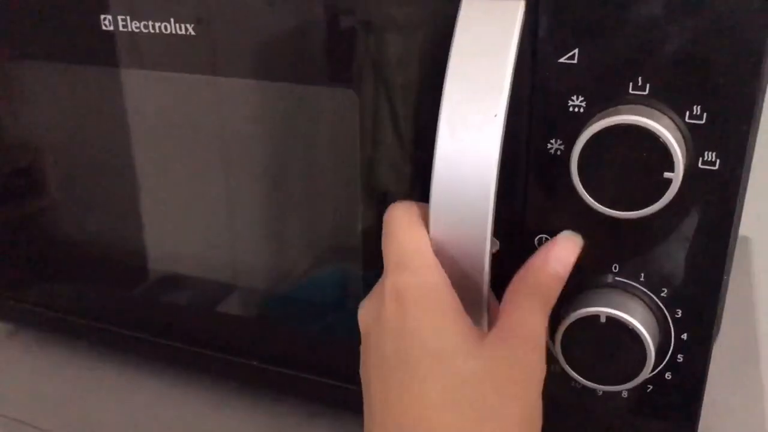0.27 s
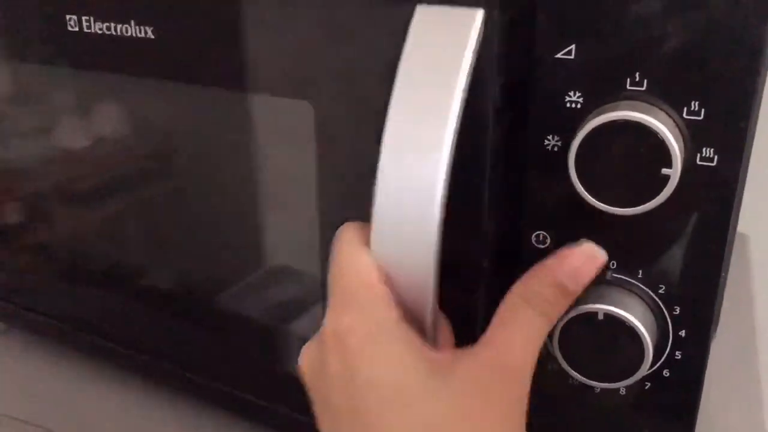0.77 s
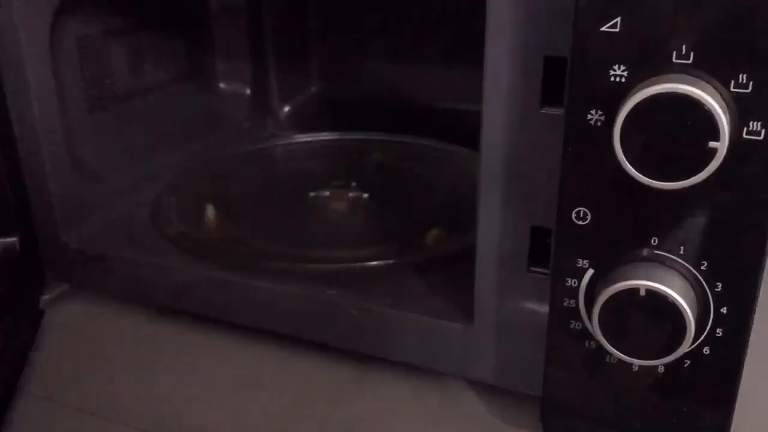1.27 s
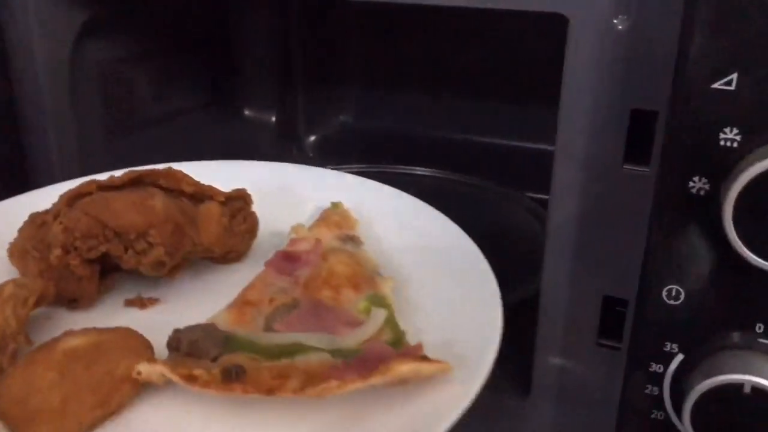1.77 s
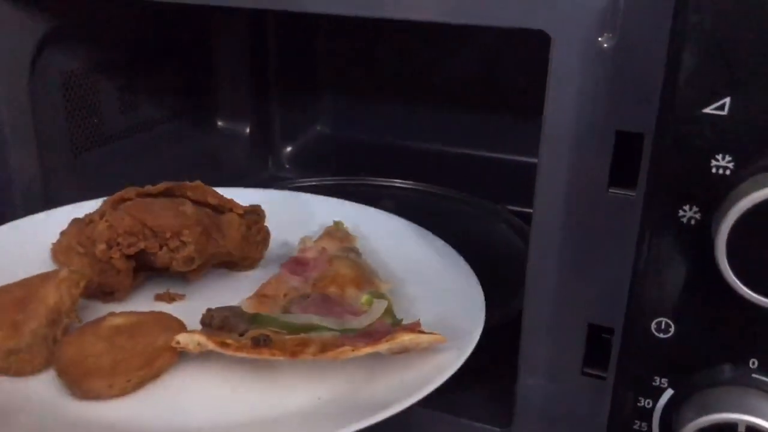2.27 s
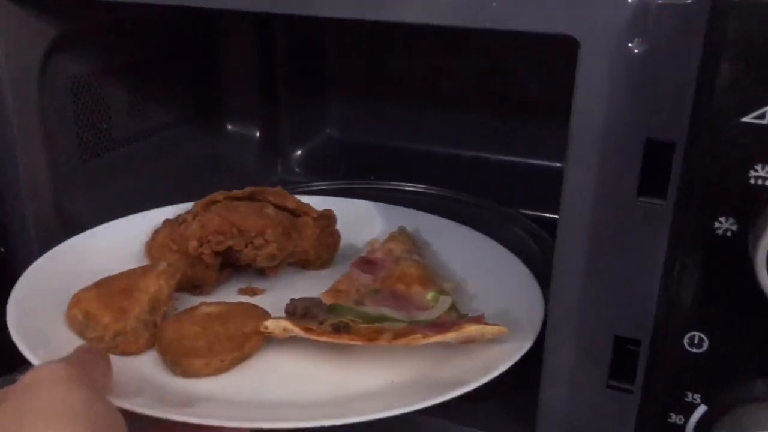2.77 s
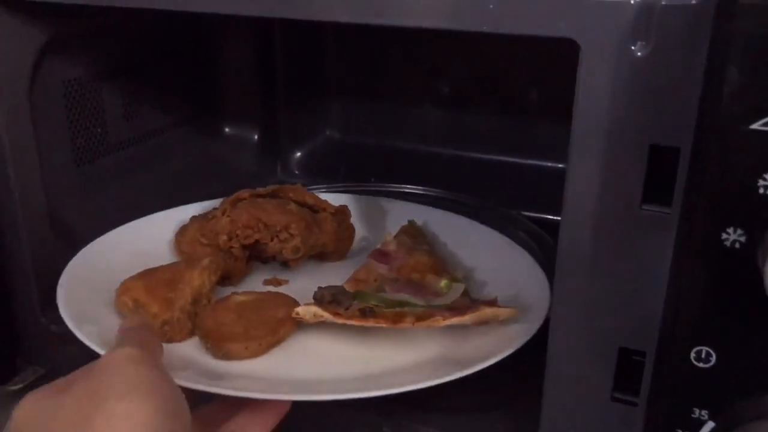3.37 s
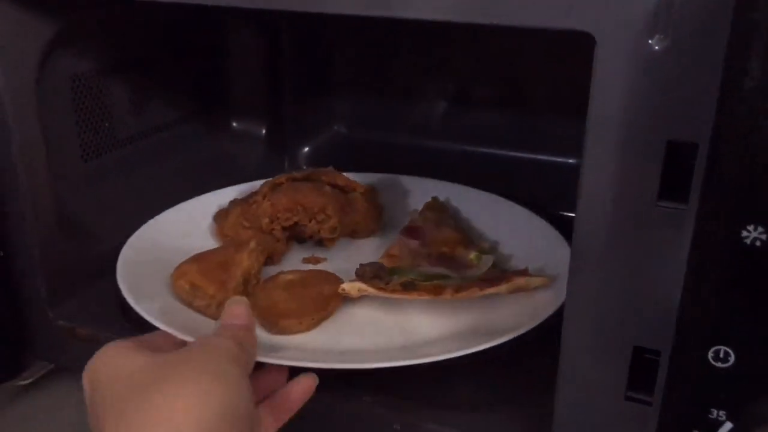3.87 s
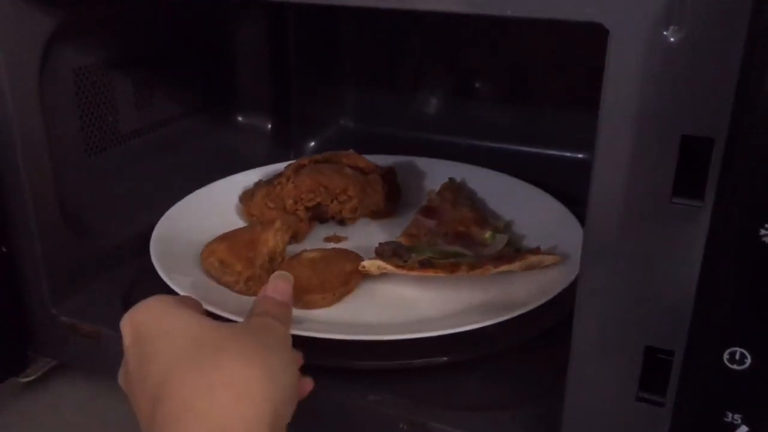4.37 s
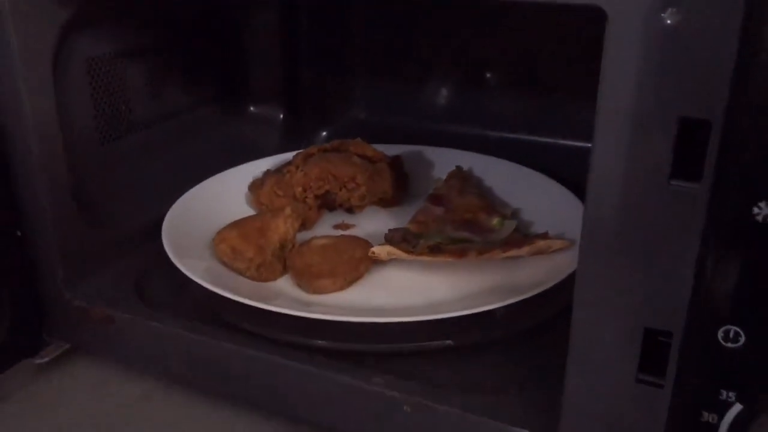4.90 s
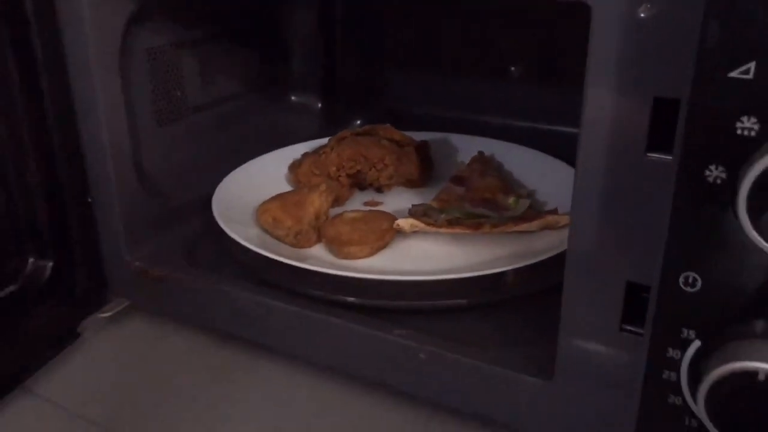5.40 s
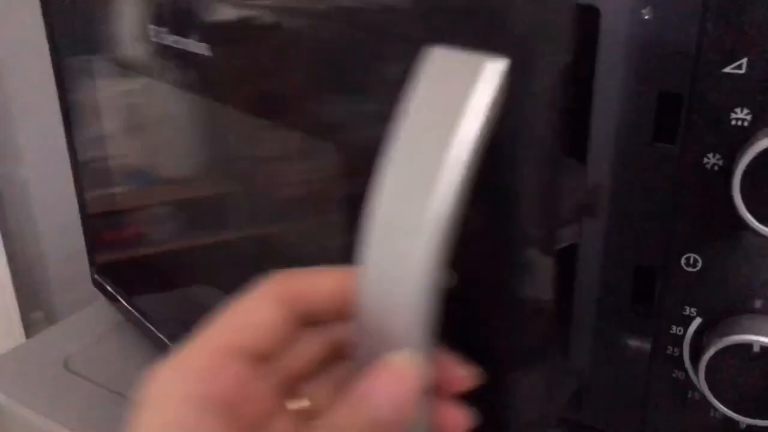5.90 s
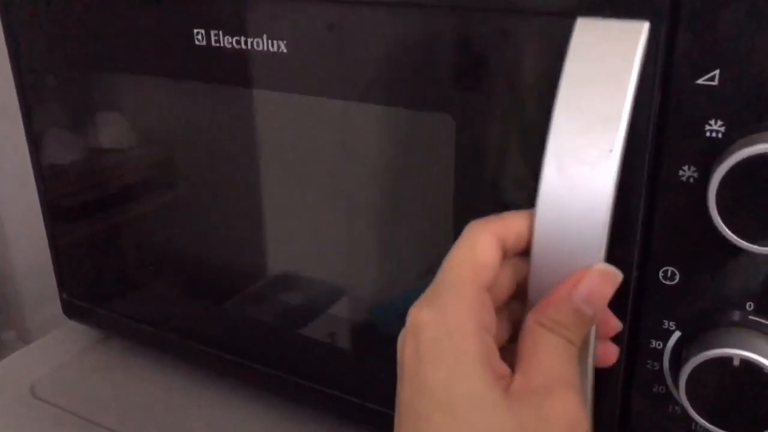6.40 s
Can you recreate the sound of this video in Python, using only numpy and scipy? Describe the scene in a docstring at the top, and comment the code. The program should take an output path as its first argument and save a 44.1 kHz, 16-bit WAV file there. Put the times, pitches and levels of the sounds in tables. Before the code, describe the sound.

A microwave oven door knocks and unlatches, a faint low hum begins, a china plate clinks and clatters onto the glass turntable, and the door snaps shut.

```python
"""Over soft room noise a microwave door knocks and is unlatched; a low electric hum then starts.
A china plate clinks against the glass turntable, clatters down on it and is slid to the middle.
The door swings back, knocking lightly, and snaps shut.
Blows are short forces driving decaying modes and noise bursts; rubs are gritty noise through like bodies.
Hum is a few wavering sines; room noise is coloured noise."""
import sys
import numpy as np
from scipy import signal
from scipy.io import wavfile

SR = 44100
rng = np.random.default_rng(int(sys.argv[2]) if len(sys.argv) > 2 else 0)


def put_to_file(sound):
    """Save the sound as 16-bit audio at rate SR, in the file named by the first command-line argument."""
    columns = np.atleast_2d(sound).T  # one column per channel
    safe = np.clip(columns, -1, 1)
    whole_steps = np.round(safe * 32767)
    wavfile.write(sys.argv[1], SR, whole_steps.astype(np.int16))


N = 293265
TIME = np.arange(N) / SR
RING_TIME = TIME[:SR]
CUTOFF_HZ = 15900

# sprung latch snapping open, then shut: (time [s], level [dB])
LATCH_SNAP_EVENTS = [(0.639, -17.5), (6.5486, -10)]
# ringing modes of the china plate: (frequency [Hz], relative level [dB], t60 [s])
CHINA_MODES = [(872, -11.5, 0.48), (847, -17, 0.2), (868, -20, 0.56), (950, -23, 0.36), (1111, -10, 0.4),
               (1120, -17, 0.19), (1698, 3, 0.17), (1738, -4.5, 0.25), (1704, -7.5, 0.47),
               (2160, -20, 0.28), (2330, -16, 0.2), (3146, -11, 0.41), (3240, -1, 0.19), (3220, -14.5, .2),
               (3800, -35.5, .24), (4380, -25.5, .28), (5130, -20.5, 0.34), (5030, -22.5, .2),
               (5520, -12.5, 0.2), (6360, -30, .15), (6960, -13, .19), (7500, -18.5, 0.17),
               (7500, -26, .24), (9400, -27, 0.26), (9590, -5.5, 0.14), (12700, -16.5, .14),
               (14060, -23, 0.12)]


def from_db(db):
    """Decibels to gain."""
    return 10 ** (np.asarray(db) / 20)


def rms_one(x):
    """Scale to rms 1."""
    return x / np.sqrt(np.mean(x ** 2) + 1e-20)


def unit_energy(x):
    """Scale a response so that it passes white noise at an unchanged level."""
    return x / np.linalg.norm(x)


def at_hz(points, hz):
    """Read a table on a log-frequency axis."""
    f, value = np.transpose(points)
    return np.interp(np.log(hz), np.log(f), value)


def fade(t60_s):
    """Exponential decay, 60 dB down after t60."""
    return np.exp(-np.log(1000) * RING_TIME / t60_s)


def drift(knots_per_s, size=N):
    """Random wander: straight lines between normal knots of spread 1."""
    knots = rng.standard_normal(4096)
    return np.interp(TIME[:size] * knots_per_s, np.arange(len(knots)), knots)


def through(x, response):
    """Drive a body with a force."""
    return signal.fftconvolve(x, response)[:N]


def add(track, s, sound):
    """Mix a sound into a track at time s."""
    start = int(s * SR)
    track[start:start + len(sound)] += sound[:N - start]


def coloured(colour, envelope):
    """Noise in bands, each under envelope(hz) with the energy its colour gives; overall rms 1."""
    edges_hz = np.geomspace(22, 17000, 23)
    out = 0
    for low, high in zip(edges_hz, edges_hz[1:]):
        hz = np.sqrt(low * high)
        shape = envelope(hz)
        band_filter = signal.butter(2, [low, high], "band", fs=SR, output="sos")
        band = signal.sosfilt(band_filter, shape * rng.standard_normal(len(shape)))
        out = out + rms_one(band) * np.sqrt(high - low) * from_db(at_hz(colour, hz))
    return rms_one(out)


def crack(colour, t60_s, bass_stretch, room_db):
    """Short burst of dense modes, longer in the bass, plus room tail; rms 1 over its first 10 ms."""
    # room decay: (frequency [Hz], t60 [s])
    room_t60 = [(100, 0.9), (300, 0.8), (1000, 0.47), (3000, 0.43), (7000, 0.3), (15000, 0.28)]

    def decay(hz):
        """Body decay plus room decay in one band."""
        body = fade(t60_s * (1000 / hz) ** bass_stretch)
        return body + from_db(room_db) * fade(at_hz(room_t60, hz))

    burst = coloured(colour, decay)
    return burst / np.sqrt(np.mean(burst[:SR // 100] ** 2))


def ring(modes, swell_s, echo_share=0.73, knots_per_s=70):
    """Decaying sines that build up over swell_s; gathering reflections make each one flutter."""
    echoes = echo_share * (1 - fade(0.13))
    tones = 0
    for hz, db, t60_s in modes:
        wander = drift(knots_per_s, size=SR) + 1j * drift(knots_per_s, size=SR)
        flutter = 1 - echoes / 2 + echoes * wander
        sine = np.imag(flutter * np.exp(2j * np.pi * hz * RING_TIME))
        tones = tones + from_db(db) * fade(t60_s) * sine
    return tones * (1 - np.exp(-RING_TIME / swell_s))


def upper_partials(t60_s, count):
    """Unevenly spaced high bending modes; t60_s holds at 5 kHz and the higher ones die sooner."""
    # upper partials of china and glass: (frequency [Hz], level of each before scatter [dB])
    partial_levels = [(2400, -23), (5000, -18), (8000, -28.5), (12000, -29.5), (16000, -27.5)]
    hz = np.interp(np.arange(count) + rng.random(count), [0, count], [2400, CUTOFF_HZ])
    levels_db = at_hz(partial_levels, hz) + rng.uniform(-1.5, 7.5, count)
    signs = rng.choice([-1, 1], count)   # modes meet the microphone in either polarity
    tones = 0
    for f, db, sign in zip(hz, levels_db, signs):
        decay = fade(t60_s * np.sqrt(5000 / f))
        tones = tones + sign * from_db(db) * decay * np.sin(2 * np.pi * f * RING_TIME)
    return tones


def contact(hard_hz, chatter_db, chatter_s, order):
    """Force of one blow: a click and a swell of tiny rebounds, rounded by a soft touch."""
    t = RING_TIME[:SR // 20]
    rebounds = rng.standard_normal(len(t)) * t * np.exp(-(t / chatter_s) ** 2)
    force = from_db(chatter_db) * unit_energy(rebounds)
    force[0] += 1
    soft = signal.butter(order, min(hard_hz, .45 * SR), fs=SR)
    mid_gain = 1 / np.hypot(1, 1000 / hard_hz)   # keeps dull blows about as loud as sharp ones
    return signal.lfilter(*soft, unit_energy(force)) / mid_gain


def strokes(rows, taper=0.29):
    """Pressure of strokes (time [s], length [s], level [dB]) that rise, hold and let go."""
    pressure = np.zeros(N)
    for s, length_s, db in rows:
        add(pressure, s, from_db(db) * signal.windows.tukey(int(length_s * SR), taper))
    return pressure


def rubbing(pressure, response, grain_db):
    """Friction: a gritty force that follows the pressure, heard through a body."""
    grit = rms_one(rng.standard_normal(N) * from_db(grain_db * drift(400)))
    return through(pressure * grit, unit_energy(response))


def room_noise():
    """Steady coloured noise of the room."""
    # spectrum: (frequency [Hz], relative density [dB per Hz])
    air_colour = [(25, -39), (45, -14.5), (65, -2.5), (130, -1.5), (250, -6.5), (350, -10), (500, -15),
                  (750, -14), (1330, -17), (4140, -28.5), (8360, -40.5), (16000, -48.5)]
    level_db = -52
    return from_db(level_db) * coloured(air_colour, lambda hz: np.ones(N))


def hum(waver_db, wander_hz):
    """A motor somewhere in the kitchen: harmonics of one wandering pitch at a wavering level."""
    # level before waver: (time [s], level [dB])
    hum_level = [(1.65, -48), (2.14, -62.5), (3.31, -52.5), (4.09, -52.5), (5.05, -46), (5.93, -50),
                 (6.5, -51)]
    # harmonics: (multiple of the pitch, relative level [dB])
    harmonics = [(1, -3.5), (2, -30), (5, -24)]
    pitch_hz, start_s, rise_s = 100.2, 1.455, 0.086
    phase = 2 * np.pi * np.cumsum(pitch_hz + wander_hz * drift(5)) / SR
    tone = sum(from_db(db) * np.sin(k * phase) for k, db in harmonics)
    running = np.clip((TIME - start_s) / rise_s, 0, 1)
    level_db = np.interp(TIME, *np.transpose(hum_level)) + waver_db * drift(11)
    return running * rms_one(tone) * from_db(level_db)


def rattle(count):
    """Loose hooks and spring: uneven little clicks that die away after each snap of the latch."""
    length_s, start_db, fall_db_per_s = 0.13, -15.5, 170   # start_db relative to the snap
    force = np.zeros(N)
    for s, db in LATCH_SNAP_EVENTS:
        for after_s in length_s * (np.arange(count) + rng.random(count)) / count:
            if s + after_s < TIME[-1]:
                add(force, s + after_s, from_db([db + start_db - fall_db_per_s * after_s]))
    return force


def door():
    """Latch hooks rub and crack against the plastic door, ring its panel and boom the steel cabinet."""
    # hooks tick twice, then strike home: (lead before snap [s], level re snap [dB], hardness [Hz])
    latch_contacts = [(0.029, -22.5, 4900), (0.013, -14, 17500), (0.0008, 0, 11200)]
    # door knocks on frame and hinge, with a few sharp latch ticks among them: (time [s], level [dB], hardness
    # [Hz])
    door_knocks = [(0.3175, -41, 14000), (0.405, -31.5, 1300), (0.4057, -42.5, 16100),
                   (0.4535, -36.5, 7040), (0.494, -61, 6000), (0.689, -30, 15800), (0.701, -29.5, 330),
                   (0.773, -43.5, 2500), (5.1075, -44, 380), (5.272, -51.5, 2400), (6.244, -45.5, 2850),
                   (6.279, -46.5, 2880), (6.346, -40.5, 2000), (6.4019, -35.5, 3880), (6.555, -17.5, 500),
                   (6.574, -19.5, 5500)]
    # ringing modes: (frequency [Hz], relative level [dB], t60 [s])
    panel_modes = [(795, -13, .2), (1110, -12.5, 0.091), (1290, -26, .11), (1728, -23.5, 0.21),
                   (2150, -21, 0.14), (2930, -16.5, .15)]
    cabinet_modes = [(133.6, 3.5, 0.24), (152.5, -2.5, 0.37), (190.3, -11, 0.54), (228.3, -4, 0.29),
                     (266, -18, 0.55), (361.6, -7, 0.8)]
    # dense short-lived modes, struck and rubbed: (frequency [Hz], relative density [dB per Hz])
    snap_colour = [(70, -1.5), (150, 5.5), (300, -1), (480, -5.5), (850, 2.5), (1500, 0), (2200, -5),
                   (3500, -4.5), (6000, -11.5), (10000, -18), (15000, -13.5)]
    strain_colour = [(70, -18), (170, 12), (350, 2.5), (800, -3), (1500, -8), (2500, -10.5), (6000, -34),
                     (15000, -36)]
    ramp_s, ramp_db = 0.043, -18   # hooks rub along ramps from the first tick; level re snap
    drag_s, drag_db, drag_follows, drag_below_hz = 0.0716, -21, 0.7, 11000   # harder clicks let go at once
    panel_db, panel_knee_hz = 7, 6500   # blows harder than the knee stay mostly in the latch
    boom_db, boom_knee_hz = 3.5, 6000
    boom_loss = 0.25   # extra dB lost per dB below the heaviest knock
    low_cut_hz = 70   # every door sound thins out below this

    latch = [(s - lead_s, db + step_db, hard_hz)
             for s, db in LATCH_SNAP_EVENTS for lead_s, step_db, hard_hz in latch_contacts]
    ramps = [(s - latch_contacts[0][0], ramp_s, db + ramp_db) for s, db in LATCH_SNAP_EVENTS]
    drags = [(s, drag_s, drag_db + drag_follows * db)
             for s, db, hard_hz in door_knocks if hard_hz < drag_below_hz]
    heaviest_db = max(db for _, db, _ in door_knocks)
    force, on_panel, shove = np.zeros((3, N))
    for s, db, hard_hz in latch + door_knocks:
        blow = from_db(db) * contact(hard_hz, chatter_db=-4, chatter_s=0.0039, order=2)
        add(force, s, blow)
        add(on_panel, s, from_db(panel_db) * blow / (1 + (hard_hz / panel_knee_hz) ** 2))
        shove_db = db + boom_db - boom_loss * max(heaviest_db - db, 0)
        add(shove, s, from_db([shove_db]) / (1 + (hard_hz / boom_knee_hz) ** 2))

    snap_body = crack(snap_colour, t60_s=0.051, bass_stretch=0.52, room_db=-13.5)
    strain_body = crack(strain_colour, t60_s=0.069, bass_stretch=0.22, room_db=-15.0)
    snap = through(force + rattle(count=14), snap_body)
    panel = through(on_panel, ring(panel_modes, swell_s=0.00026))
    boom = through(shove, ring(cabinet_modes, swell_s=0.0052))
    strain = rubbing(strokes(ramps + drags), strain_body, grain_db=-3.0)
    low_cut = signal.butter(2, low_cut_hz, "high", fs=SR, output="sos")
    return signal.sosfilt(low_cut, snap + panel + boom + strain)


def plate_rubs(china_top):
    """The sliding unglazed foot shimmers in the plate's upper partials; under weight the turntable grinds."""
    # light brushes of the foot over the glass: (time [s], length [s], level [dB])
    brush_strokes = [(3.122, 0.048, -53), (3.264, 0.052, -53), (3.387, 0.034, -42.5), (3.645, 0.025, -53.5),
                     (3.855, 0.011, -54), (4.344, 0.025, -49), (4.531, 0.013, -52.5)]
    # light hiss and heavy grind: (frequency [Hz], relative density [dB per Hz])
    hiss_colour = [(70, -49), (800, -4), (2500, -3.5), (5000, 1.5), (8000, -5), (11000, -19.5), (15000, -9)]
    grind_colour = [(70, -24), (170, -16), (300, 3), (420, -7.5), (620, 7.5), (950, -4), (1400, -5.5),
                    (2200, -14), (4000, -20.5), (8000, -45.5), (15000, -42)]
    brush_grind_db = -3   # re the light brush
    slide_s, slide_length_s, slide_light_db = 3.70, 0.662, -57.5
    seat_s, seat_length_s, seat_db = 3.988, 0.0113, -30   # foot drops into its seat
    grind_db, swell_db_per_s, ease_db_per_s, grind_floor_db = -37, 62, 161, -58

    china = china_top + from_db(-12.5) * ring(CHINA_MODES, swell_s=0.005)
    # light contact favours the treble, the hand damps it
    shimmer = unit_energy(np.diff(china * fade(0.8), prepend=0))
    hiss = unit_energy(crack(hiss_colour, t60_s=0.012, bass_stretch=0.12, room_db=-20.5))
    grind = crack(grind_colour, t60_s=0.11, bass_stretch=0.32, room_db=-18.0)

    brushes = strokes(brush_strokes)
    unevenness = from_db(1.74 * drift(40))   # the hand moves unevenly
    push = strokes([(slide_s, slide_length_s, 0)], taper=0.055) * unevenness
    # grinding swells up to the seat, then eases off
    off_peak_db = np.maximum(swell_db_per_s * (seat_s - TIME), ease_db_per_s * (TIME - seat_s))
    weight = from_db(grind_db - off_peak_db) + from_db(grind_floor_db)
    seat = strokes([(seat_s, seat_length_s, seat_db)])
    light = brushes + from_db(slide_light_db) * push
    heavy = from_db(brush_grind_db) * brushes + weight * push + seat
    return rubbing(light, shimmer + from_db(-0.5) * hiss, grain_db=8) + rubbing(heavy, grind, grain_db=5.5)


def plate_blows(china_top, glass_top):
    """Each touch drives both bodies: the rim mostly the plate, the foot mostly the turntable."""
    # foot rocking down on the turntable: (time [s], level [dB])
    foot_blows = [(3.436, -16.5), (3.475, -19), (3.4931, -12), (3.534, -15.5), (3.618, -25.5), (3.776, -36),
                  (3.895, -41), (3.959, -34), (3.989, -28.5)]
    # ringing modes of the turntable: (frequency [Hz], relative level [dB], t60 [s])
    turntable_modes = [(590, -19.5, 0.23), (679.4, -8.5, 0.14), (913, -9.5, .13), (914, -16.5, 0.099),
                       (1424, -10, 0.14), (1434, -5.5, 0.096), (1376, -13.5, 0.16), (1810, -7.5, .16),
                       (1790, 1.5, 0.063), (1750, -10, 0.26), (2245, -20, 0.25), (2950, -22, .14),
                       (3230, -18.5, 0.154), (3510, -9.5, 0.063), (3610, -15, 0.18), (4870, -24, 0.091),
                       (4720, -32.5, 0.098), (6270, -23.5, 0.13), (6120, -24, 0.11), (8360, -22.5, 0.13),
                       (10000, -25.5, .1)]
    # dense short-lived modes: (frequency [Hz], relative density [dB per Hz])
    china_colour = [(70, -21.5), (130, -2), (280, -6), (400, -20), (600, -6.5), (900, -8), (1400, 2),
                    (2200, -9.5), (3500, -8), (5500, -11.5), (8000, -18.5), (15000, -24.5)]
    turntable_colour = [(70, -16.5), (130, -13), (260, 7), (400, -13.5), (850, 1), (1500, 0.5), (2200, -1),
                        (3500, -1), (5200, -5.5), (8000, -16), (15000, -18)]
    clink_s, clink_db, clink_hard_hz = 2.9617, -13.5, 11700
    clink_glass_db, clink_chatter_db = -27.5, -27   # re the clink
    foot_hard_hz, softer_db_per_octave = 8500, 7   # strongest blow; weaker ones are duller
    foot_china_db, foot_chatter_db = -13, 4   # re the blow

    china = (crack(china_colour, t60_s=0.081, bass_stretch=0.17, room_db=-13.0)
             + ring(CHINA_MODES, swell_s=0.0045) + from_db(-8.0) * china_top)
    glass_crack = crack(turntable_colour, t60_s=0.016, bass_stretch=0.083, room_db=-24.5)
    glass_ring = ring(turntable_modes, swell_s=0.00088)
    glass = from_db(-2.0) * glass_crack + from_db(1.5) * glass_ring + from_db(3) * glass_top

    rim, foot = np.zeros((2, N))
    clink = contact(clink_hard_hz, clink_chatter_db, chatter_s=0.0046, order=1)
    add(rim, clink_s, from_db(clink_db) * clink)
    strongest_db = max(db for _, db in foot_blows)
    for s, db in foot_blows:
        hard_hz = foot_hard_hz * 2 ** ((db - strongest_db) / softer_db_per_octave)
        add(foot, s, from_db(db) * contact(hard_hz, foot_chatter_db, chatter_s=0.0042, order=1))
    on_china = rim + from_db(foot_china_db) * foot
    on_glass = foot + from_db(clink_glass_db) * rim
    return through(on_china, china) + through(on_glass, glass)


def scene():
    """Room noise, hum, door and plate at one microphone."""
    china_top = upper_partials(t60_s=0.14, count=64)
    glass_top = upper_partials(t60_s=0.077, count=56)
    plate = plate_blows(china_top, glass_top) + plate_rubs(china_top)
    background = room_noise() + hum(waver_db=1.9, wander_hz=.4)
    return (background + door() + plate)[None]


def record(dry):
    """Round the highest peaks and cut the top above CUTOFF_HZ."""
    rounded = dry / (1 + (dry / .9) ** 4) ** (1 / 4)
    top_cut = signal.ellip(12, .1, 70, CUTOFF_HZ, fs=SR, output="sos")
    return signal.sosfilt(top_cut, rounded)


dry = scene()
out = record(dry)
put_to_file(out)
```